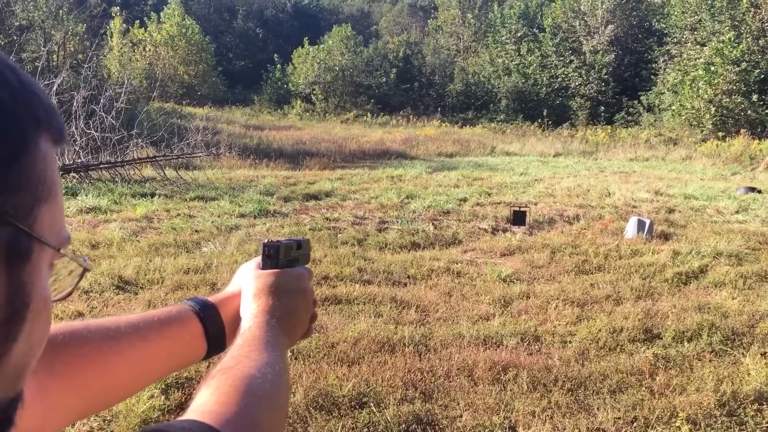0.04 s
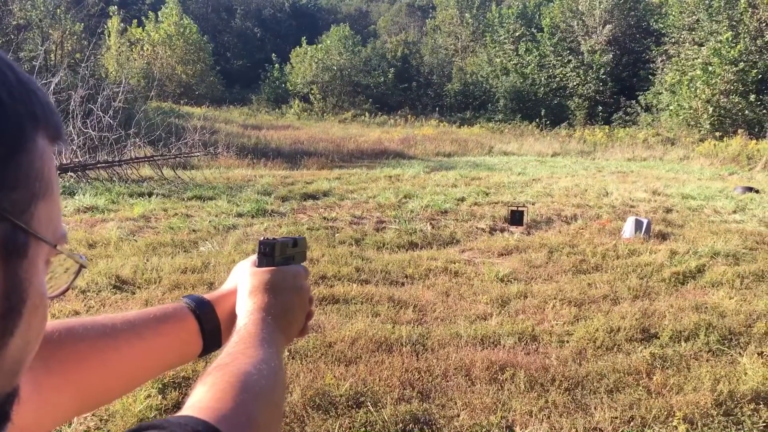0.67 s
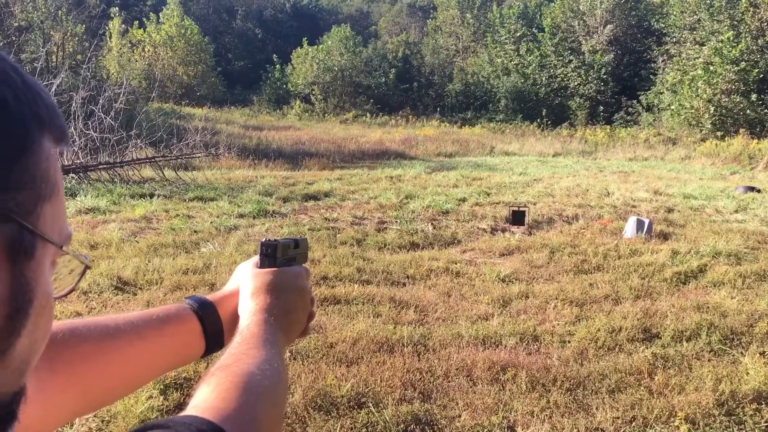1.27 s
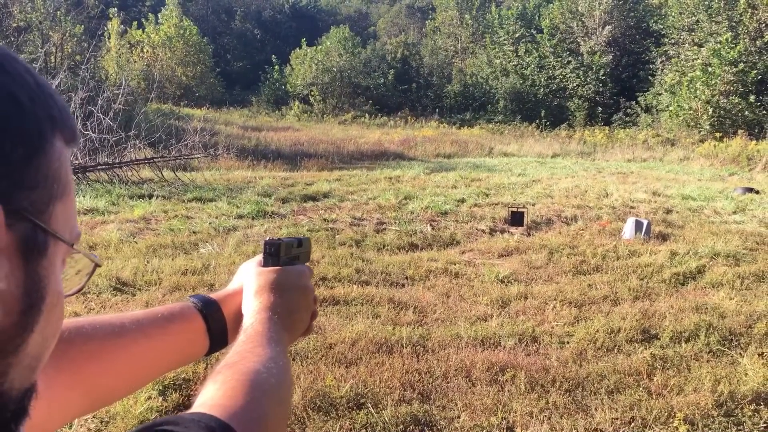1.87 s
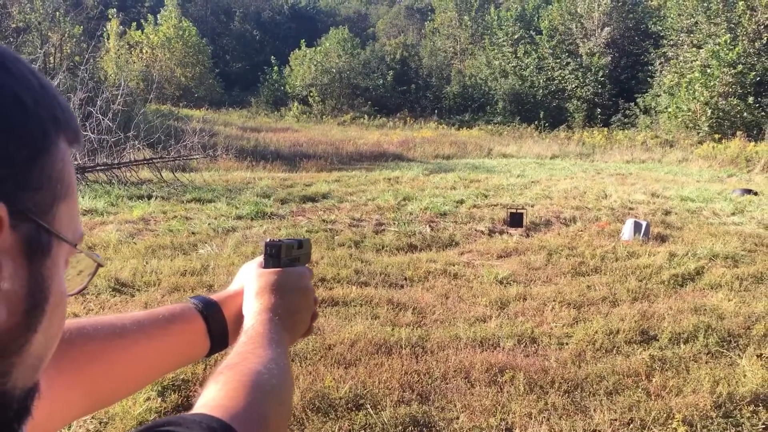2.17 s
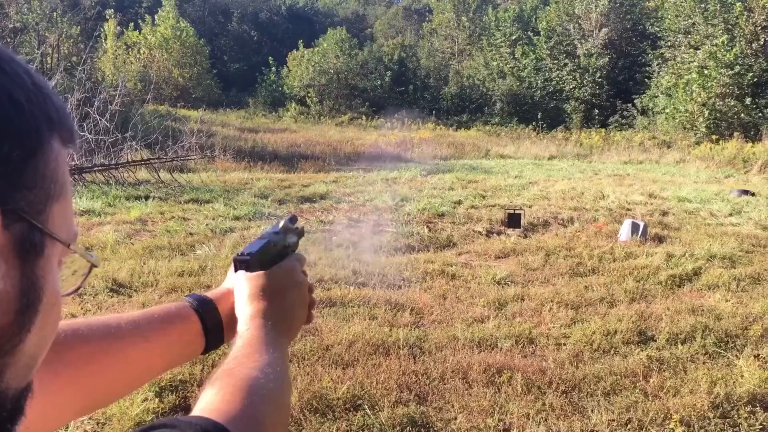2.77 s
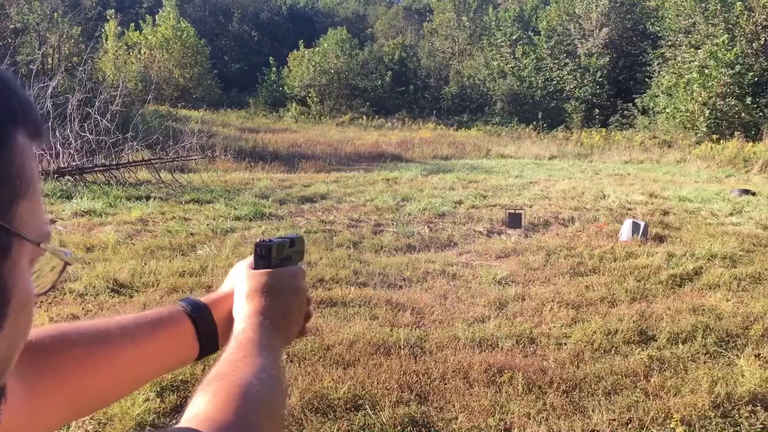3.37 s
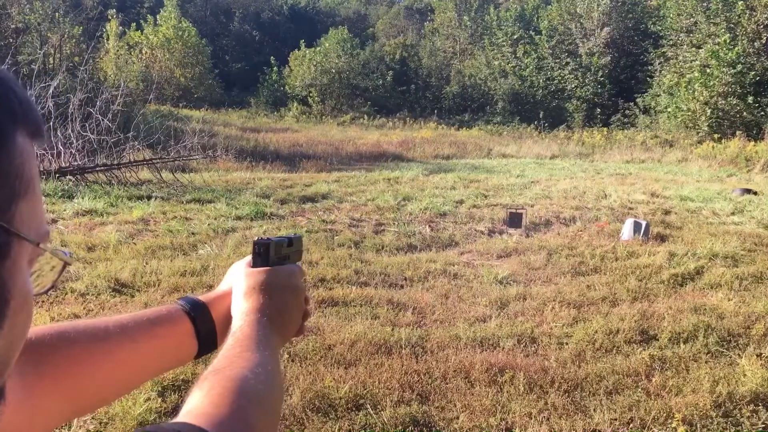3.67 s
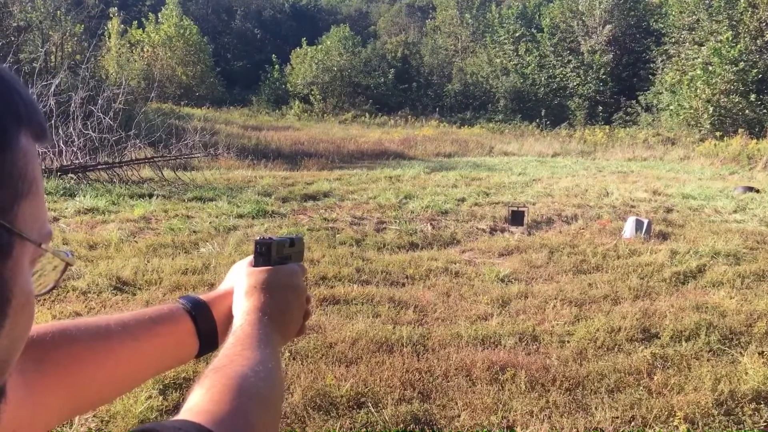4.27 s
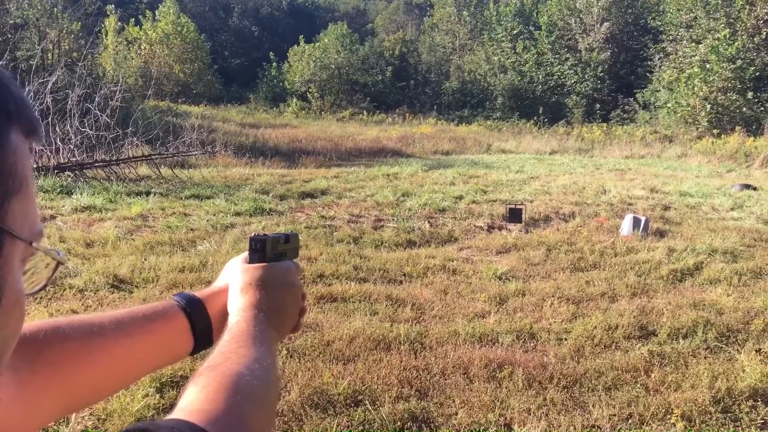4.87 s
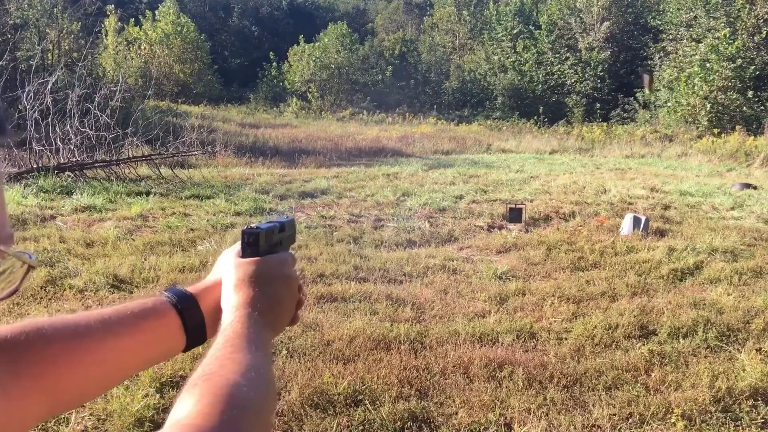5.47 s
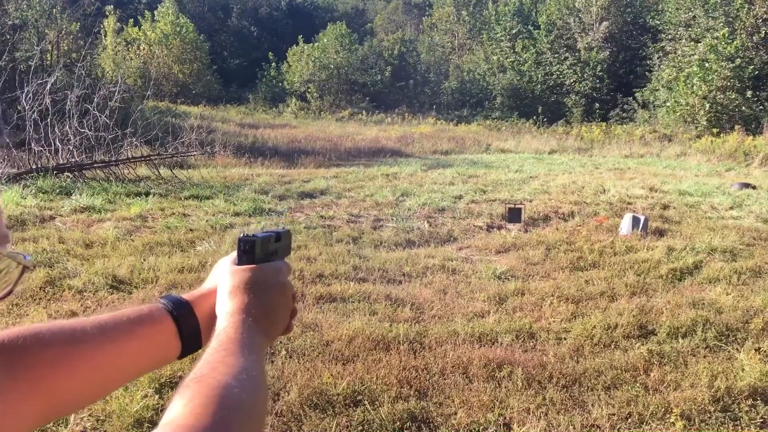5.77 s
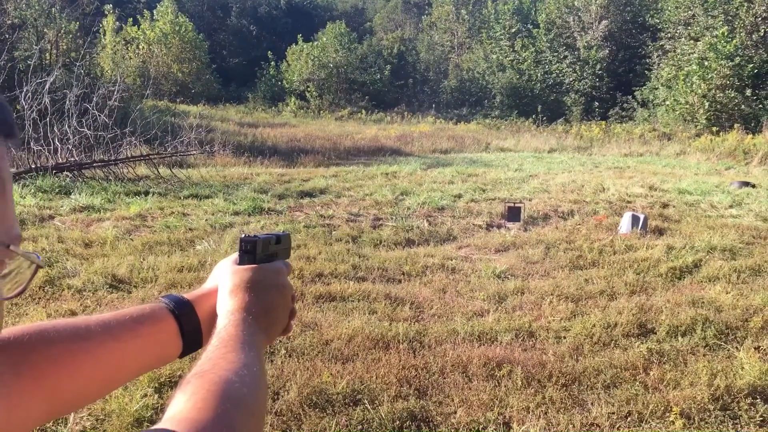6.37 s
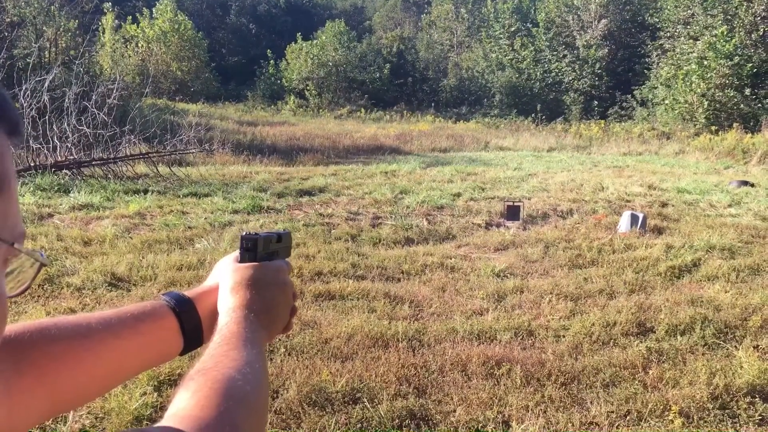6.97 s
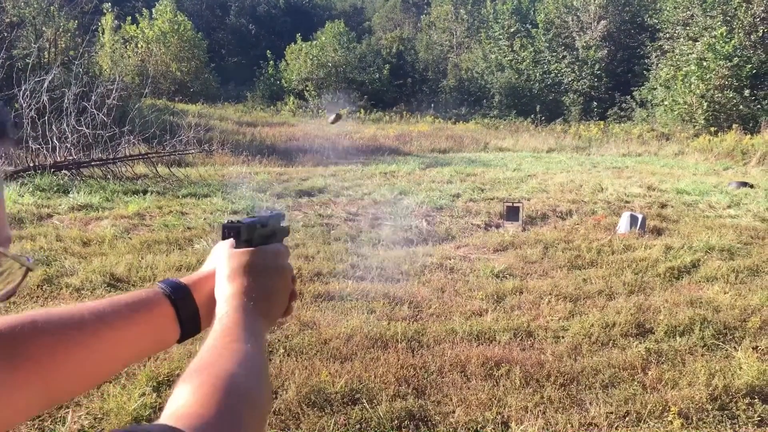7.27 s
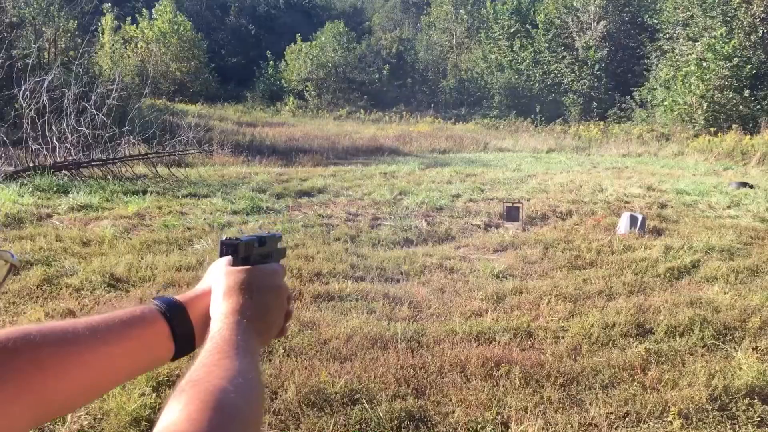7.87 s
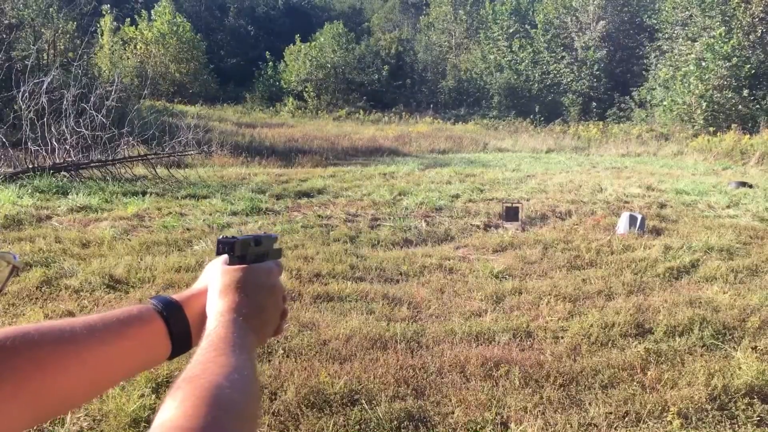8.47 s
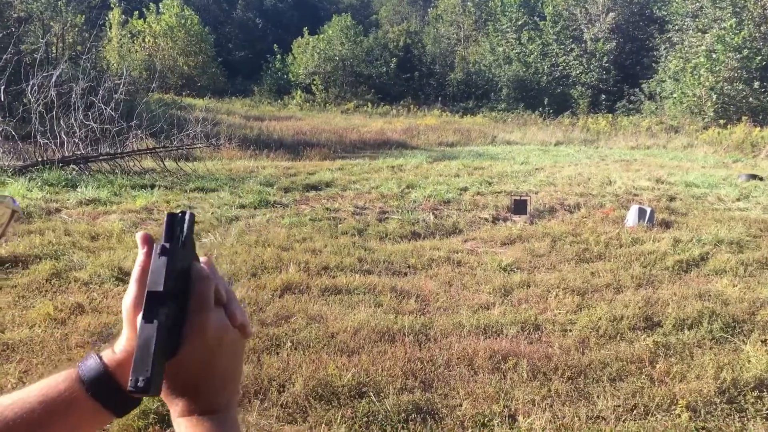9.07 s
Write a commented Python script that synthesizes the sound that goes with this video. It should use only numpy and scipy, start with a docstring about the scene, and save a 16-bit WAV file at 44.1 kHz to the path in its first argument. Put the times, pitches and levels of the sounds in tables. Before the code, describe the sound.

Three loud pistol shots crack an arm's length from the microphone in a field edged by forest. Before them come high insect song, a low far-off traffic rumble and one faint bird call. Every shot booms, smacks a metal target and rolls away through the trees, briefly pushing down the insects. The last two send a case ringing through the air, and small gun clicks and grassy rustles fall in the gaps.

```python
"""Three pistol shots in a meadow, fired an arm's length from the microphone.
At first insects sing over distant traffic and a fading hum, while an earlier shot's echo dies away.
A spent case drops into the grass, a bird calls, the trigger clicks. Then each blast overloads the
recorder, the slide shuts, the bullet slaps a plate, and brush and forest send the report back; the last
two cases ring in flight. After each shot the gain control recovers and the ducked insects return."""
import sys
import numpy as np
from scipy import signal
from scipy.fft import rfft, irfft, next_fast_len
from scipy.io import wavfile
from scipy.ndimage import uniform_filter1d, minimum_filter1d

SR = 44100
rng = np.random.default_rng(int(sys.argv[2]) if len(sys.argv) > 2 else 0)


def generate_wav(sig):
    """Save sig (samples, or channels by samples) to the path in sys.argv[1] as 16-bit PCM at SR."""
    pcm = np.round(np.clip(np.atleast_2d(sig).T, -1, 1) * 32767).astype(np.int16)
    wavfile.write(sys.argv[1], SR, pcm)


N = 402620

# shots: t/s, boom level/dB, crack level/dB, swing level/dB, swing f/Hz, target level/dB, echo level/dB
GUNSHOTS = [(2.8330, 11, 2.5, 8, 63, 9, -12.5), (5.1410, 5.5, 5, 1, 48.5, 9, -11.5),
            (7.2150, 8.5, 6, 8, 49.2, 11.5, -10)]
CRACK_S, GROUND_LAG_S = .021, .0045  # the shock follows the first gas; its ground reflection lags it
SOUND_M_PER_S = 343


def amp(db):
    """Amplitude ratio of a level in decibels."""
    return 10 ** (np.asarray(db) / 20)


def unit_rms(x):
    """Normalisation to unit mean power."""
    return x / np.sqrt(np.mean(x ** 2) + 1e-20)


def curve_at(points, hz):
    """Interpolation on a logarithmic frequency axis."""
    f, value = np.transpose(points)
    return np.interp(np.log(hz + 1), np.log(f + 1), value)


def clock(seconds):
    """Uniform sampling times from zero."""
    return np.arange(int(seconds * SR)) / SR


def add(mix, s, sound):
    """Superposition of a sound at time s, which may be negative."""
    at = round(s * SR)
    sound = sound[max(-at, 0):]
    part = mix[max(at, 0):][:len(sound)]
    part += sound[:len(part)]


def noise(spectrum, size):
    """Spectral shaping: noise of rms 1 whose density follows the given relative levels."""
    full = next_fast_len(size + 2048)
    hz = np.fft.rfftfreq(full, 1 / SR)
    white = rfft(rng.standard_normal(full))
    return unit_rms(irfft(white * amp(curve_at(spectrum, hz)), full))[:size]


def drift(per_s, size):
    """Random modulation of rms 1, interpolated between per_s values a second."""
    knots = rng.standard_normal(2000)
    return unit_rms(np.interp(np.arange(size) / SR * per_s, np.arange(len(knots)), knots))


def envelope(t, attack_s, hold_s, t60):
    """Quadratic onset, plateau, then exponential decay by 60 dB in t60 seconds."""
    fall_db = -60 * np.maximum(t - attack_s - hold_s, 0) / t60
    return np.clip(t / attack_s, 0, 1) ** 2 * amp(fall_db)


def burst(spectrum, db, attack_s, hold_s, t60):
    """Turbulence and scattering have random phase: a pulse of shaped noise."""
    t = clock(.7)
    return amp(db) * noise(spectrum, len(t)) * envelope(t, attack_s, hold_s, t60)


def tick(spectrum, t60):
    """Impact excitation: a brief contact gives broadband, quickly damped noise."""
    t = clock(0.67)
    return noise(spectrum, len(t)) * amp(-60 * t / t60)


def ring(modes):
    """Free vibration: each mode is a damped sinusoid."""
    t = clock(1)
    return sum(amp(db - 60 * t / t60) * np.sin(2 * np.pi * hz * t) for hz, db, t60 in modes)


def insects():
    """Stridulation: a far chorus, a near cricket trilling with each wing stroke, a lower one chirping."""
    # spectra of the three songs: f/Hz, level/dB
    chorus_band = [(2800, -31), (4200, -25), (4900, -18.5), (5350, -9.5), (5900, -10), (6500, -5),
                   (7100, -2), (7700, -8), (8600, -22), (10400, -28.5), (11500, -23.5), (14000, -20),
                   (15700, -23.5)]
    trill_band = [(6000, -43.5), (6800, -5.5), (7130, -1), (7400, -16.5), (8200, -45)]
    chirp_band = [(2800, -33), (3350, -4.5), (3500, -2), (3680, -9), (4200, -44)]
    t = np.arange(N) / SR
    stroke_hz = 28.1 * (1 + .012 * drift(5, N))
    strokes = np.sin(np.pi * np.cumsum(stroke_hz) / SR) ** 4
    chirps = np.sin(np.pi * (3.05 * t + .66)) ** 2
    chorus = amp(-57.5 + 0.33 * drift(9.2, N)) * noise(chorus_band, N)
    trill = amp(-64) * unit_rms(strokes) * noise(trill_band, N)
    return chorus + trill + amp(-78.5) * chirps * noise(chirp_band, N)


def traffic():
    """Distant traffic arrives as low-frequency noise of slightly fluctuating level."""
    # background spectrum: f/Hz, level/dB
    rumble = [(15, -32), (25, -23.5), (85, -4.5), (226, -23.5), (260, -25), (325, -23.5), (366, -28),
              (753, -34), (997, -36.5), (3000, -59), (3900, -86), (6600, -120)]
    return amp(-46.5 + 0.9 * drift(18, N)) * noise(rumble, N)


def hum():
    """Random amplitude and frequency modulation make a fading tone waver."""
    t = np.arange(N) / SR
    level = amp(-57.5 + 2.5 * drift(7, N)) * envelope(t, attack_s=0.31, hold_s=0.96, t60=8.5)
    hz = 325 + 4 * drift(25, N)
    return level * np.sin(2 * np.pi * np.cumsum(hz) / SR)


def echo_level(t):
    """The echo builds as sound enters the trees, then weakens by spherical spreading and absorption."""
    tree_line_m, deep_forest_m, loss_db_per_s = 38, 72.5, 10
    first_s, full_s = 2 * tree_line_m / SOUND_M_PER_S, 2 * deep_forest_m / SOUND_M_PER_S
    onset = np.clip((t - first_s) / 0.016, 0, 1)
    build_db = np.interp(t, [first_s, full_s], [-7, 0])
    beyond_s = np.maximum(t - full_s, 0)
    return onset * amp(build_db - loss_db_per_s * beyond_s) * full_s / (full_s + beyond_s)


def forest(grain_db, flutter_db):
    """Diffuse reflection from trunks and crowns; air absorption takes more treble from longer paths."""
    # scattered sound: f/Hz, level/dB
    echo_spectrum = [(30, -49.5), (70, -26.5), (150, -20.5), (300, -17), (470, -15), (600, 1), (800, 2.5),
                     (1000, 3.5), (1350, -6), (1800, -1.5), (2600, -9), (3300, -2), (6500, -4.5),
                     (9500, -10.5), (15500, -24)]
    # loss on the way: f/Hz, decay rate/(dB/s)
    absorption = [(100, 1), (400, -2), (750, 3.5), (1400, 12), (2700, 24), (4600, 39), (8000, 46),
                  (14000, 55)]
    t = clock(4)
    reflections = rng.standard_normal(len(t))
    reflections *= amp(grain_db * drift(500, len(t)) + flutter_db * drift(34.6, len(t)))
    hz, age, frames = signal.stft(unit_rms(reflections), SR, nperseg=512)
    colour = amp(curve_at(echo_spectrum, hz)[:, None] - curve_at(absorption, hz)[:, None] * age)
    colour /= np.sqrt(np.mean(colour[:, np.searchsorted(age, .5)] ** 2))  # unit power at 0.5 s
    return signal.istft(frames * colour, SR, nperseg=512)[1][:len(t)] * echo_level(t)


def landing_cases():
    """Impact: a spent case rustles the grass and rings faintly in one mode."""
    # impacts: t/s, rustle level/dB, ring level/dB
    landings = [(0.784, -57, -96), (3.711, -49, -66), (6.058, -44, -61), (6.176, -52, -66),
                (8.061, -37, -77)]
    # rustle spectrum: f/Hz, level/dB
    grass = [(1500, -25), (6000, 0), (9000, -2), (12000, 1), (15500, -10)]
    # case resonance: f/Hz, level/dB, t60/s
    brass_mode = [(10700, 0, 0.5)]
    out = np.zeros(N)
    for s, rustle_db, ring_db in landings:
        add(out, s, amp(rustle_db) * tick(grass, t60=0.05))
        add(out, s, amp(ring_db) * ring(brass_mode))
    return out


def bird():
    """A swelling downward glide, strongest in its second harmonic, reverberates among the trees."""
    start_s, length_s = 1.695, 0.11
    start_hz, sag_hz_per_s, swell_db_per_s = 2090, 3400, 54
    t = clock(.25)
    rasp = 1 + .016 * drift(700, len(t))
    phase = 2 * np.pi * np.cumsum((start_hz - sag_hz_per_s * t) * rasp) / SR
    level = amp(swell_db_per_s * (t - length_s) + 2 * drift(77, len(t)))
    level *= envelope(t, attack_s=.005, hold_s=length_s, t60=.04)
    note = level * (np.sin(2 * phase) + .5 * np.sin(phase))
    trees = rng.standard_normal(SR) * amp(-60 * clock(1) / .6)
    out = np.zeros(N)
    add(out, start_s, note)
    add(out, start_s, amp(-3) * signal.fftconvolve(note, trees / np.linalg.norm(trees)))
    return amp(-65.5) * out


def gun_clicks():
    """Contact transients of trigger and slide: each a low knock with a bright snap."""
    # contacts: t/s, knock level/dB, snap level/dB
    clicks = [(2.199, -57, -73), (4.0807, -25, -31), (4.399, -57, -75), (5.029, -63, -73),
              (6.1340, -28, -22.5), (8.8506, -36, -54), (8.9994, -52, -67)]
    # contact spectra: f/Hz, level/dB
    knock = [(300, -22), (1400, 6), (2200, -1.5), (3000, -11), (3700, 5.5), (4700, -8.5), (5600, -13),
             (7000, -15), (15000, -26)]
    snap = [(2000, -24), (7000, -34), (8300, 8), (9500, -21), (11000, -10), (12400, 2), (13800, -14),
            (15500, -15)]
    out = np.zeros(N)
    for s, knock_db, snap_db in clicks:
        add(out, s, amp(knock_db) * tick(knock, t60=0.013))
        add(out, s, amp(snap_db) * tick(snap, t60=0.0069))
    return out


def boom():
    """Sudden expansion of the first gas: a dull boom with a nasal bark, and a kick to the low modes."""
    # gas spectra: f/Hz, level/dB
    dull_gas = [(30, -10.5), (150, -15), (250, 0.5), (400, -2), (560, -2), (730, -1.5), (930, -8.5),
                (1300, -16), (2000, -19), (3100, -19), (3800, -36.5), (16000, -56)]
    bark = [(2000, -30.5), (2380, -3.5), (2550, 4.5), (2800, -8.5), (3150, -7), (3600, -36.5)]
    # low modes: f/Hz, level/dB, t60/s
    punch = [(264.7, -9, 0.068), (420, -11.5, 0.069), (706, -5, 0.036)]
    out = np.zeros(SR)
    add(out, 0, burst(dull_gas, db=0, attack_s=0.016, hold_s=0.014, t60=0.027))
    add(out, 0, burst(bark, db=-6, attack_s=0.016, hold_s=.008, t60=.04))
    add(out, .0115, amp(2) * ring(punch))
    return out


def crack():
    """After a thin hiss the shock rings hollows, reflects off the ground and scatters in the field."""
    # spectra of the hiss, the report and its scattered part: f/Hz, level/dB
    spit = [(300, -6.5), (2500, 5), (5000, -2.5), (9000, -8.5), (15500, -12)]
    report = [(140, -29.5), (230, -6.5), (674, -7), (818, -10.5), (975, -3), (1180, -5.5), (2530, -10),
              (2810, -19), (3990, -9), (4850, -13), (15500, -22.5)]
    field = [(35, -31), (60, -14.5), (231, -7.5), (976, -4.5), (1290, -7.5), (1480, -7), (2840, -12),
             (3580, -10), (4520, -16.5), (5980, -13.5), (15500, -27.5)]
    # cavity modes round the microphone: f/Hz, level/dB, t60/s
    hollows = [(313.4, -4.5, 0.044), (400, -7.5, 0.084), (680, -3, 0.16), (919, 2, 0.22), (1767, -1, 0.13),
               (1991, -16.5, .08), (2000, -13, 0.077), (2640, -13, 0.042), (2800, -14, .08),
               (3311, -12, 0.12), (3930, -13, 0.11)]
    out = np.zeros(SR)
    add(out, 0, burst(spit, db=-19.5, attack_s=.0015, hold_s=.001, t60=.06))
    add(out, CRACK_S, amp(15) * shock(overpressure_s=0.00084))
    add(out, CRACK_S, burst(report, db=5, attack_s=0.00052, hold_s=0.001, t60=.018))
    add(out, CRACK_S, amp(-7) * ring(hollows))
    add(out, CRACK_S + GROUND_LAG_S, burst(report, db=1.5, attack_s=0.0037, hold_s=.017, t60=.04))
    add(out, CRACK_S, burst(field, db=-10.5, attack_s=0.031, hold_s=.025, t60=0.46))
    return out


def shock(overpressure_s):
    """A blast wave: instant overpressure, then rarefaction."""
    u = clock(.5) / overpressure_s
    return (1 - u) * np.exp(-u)


def swing(hz, rise_s):
    """Damped oscillation behind the shock: suction first, then pressure swings that slow towards hz."""
    t = clock(.5)
    cycles = np.cumsum(hz * (1 + 1.3 * np.exp(-t / 0.0064))) / SR
    u = t / rise_s
    return -np.sin(2 * np.pi * cycles) * u ** .5 * np.exp((1 - u ** 2) / 4)


def slide():
    """Hard impact: the slide slams shut with a short, bright clash."""
    # spectrum of steel on steel: f/Hz, level/dB
    steel = [(2000, -24), (6500, 0), (9000, -2.5), (11500, -2.5), (13500, -7), (15500, -6)]
    return burst(steel, db=-1, attack_s=0.004, hold_s=.003, t60=0.04)


def target():
    """Impact excitation: each bullet splashes on a plate, whose modes ring briefly."""
    # impact spectrum: f/Hz, level/dB
    slap = [(300, -30.5), (1500, -8), (3000, -7), (3900, -1), (5200, -9.5), (7000, -1.5), (8300, -6),
            (10500, -7), (12500, -13), (15500, -13.5)]
    # plate resonances: f/Hz, level/dB, t60/s
    plate_modes = [(3640, -21.5, 0.11), (6850, -12.5, 0.061), (7900, -37, .06), (11260, -20, 0.077)]
    delay_s = .099
    out = np.zeros(N)
    for s, *_, hit_db, _ in GUNSHOTS:
        splash = tick(slap, t60=0.011) + amp(-14.5) * tick(slap, t60=0.1)
        add(out, s + delay_s, amp(hit_db) * splash)
        add(out, s + delay_s, amp(hit_db) * ring(plate_modes))
    return out


def brush():
    """A discrete echo: a pile of brush before the trees returns one dull slap."""
    # reflected spectrum: f/Hz, level/dB
    dull_slap = [(200, -23), (450, -12), (620, 16), (850, -16), (2000, -40), (8000, -60)]
    return burst(dull_slap, db=-23, attack_s=0.0083, hold_s=0.014, t60=0.044)


def pistol():
    """Direct sound of muzzle and slide comes first; echoes follow after their round-trip times."""
    brush_m = 34.8
    out = np.zeros(N)
    for s, boom_db, crack_db, swing_db, swing_hz, _, echo_db in GUNSHOTS:
        add(out, s, amp(boom_db) * boom())
        add(out, s, amp(crack_db) * crack())
        add(out, s + CRACK_S + GROUND_LAG_S, amp(swing_db) * swing(swing_hz, rise_s=0.01))
        add(out, s + 0.056, slide())
        add(out, s + 2 * brush_m / SOUND_M_PER_S, brush())
        add(out, s, amp(echo_db) * forest(grain_db=1.5, flutter_db=0.92))
    return out


def flying_cases():
    """Directional radiation: a ringing case tumbles, and its turning mouth modulates the amplitude."""
    # cases in flight: t/s, level/dB
    ejections = [(5.240, -18), (7.314, -10.5)]
    # case resonances: f/Hz, level/dB, t60/s
    brass_modes = [(3300, -6.5, 0.39), (7860, -15.5, 0.63), (11170, 0.5, .2), (11480, -15, .25),
                   (13800, -14.5, 0.96), (14210, -7.5, .15)]
    out = np.zeros(N)
    for s, db in ejections:
        tumble_hz = rng.uniform(6, 9.8)
        tumble = 1 + .5 * np.cos(2 * np.pi * tumble_hz * clock(1))
        add(out, s, amp(db) * ring(brass_modes) * tumble)
    return out


def scene():
    """Linear superposition of all sources at one microphone."""
    shots = pistol()
    add(shots, -2.3, amp(-16) * forest(grain_db=1, flutter_db=2))  # an earlier shot is still dying away
    metal = target() + flying_cases() + landing_cases() + gun_clicks()
    return (shots + metal + insects() + traffic() + hum() + bird())[None]


def recover(cut_db, db_per_s, hold_s=0.12):
    """Peak detection: follows each rise at once, holds it, then releases at a steady rate."""
    half = round(hold_s * SR / 2)
    held_db = -minimum_filter1d(-cut_db, 2 * half + 1, origin=half)
    fall_db = np.arange(N) / SR * db_per_s
    return np.maximum.accumulate(held_db + fall_db) - fall_db


def record(dry):
    """Automatic gain control with a quick and a slow release, then soft saturation and a band limit."""
    threshold_db, range_db, ceiling, cutoff_hz = -30, 18, .86, 15900
    power_db = 10 * np.log10(abs(uniform_filter1d(dry[0] ** 2, size=500)) + 1e-12)
    cut_db = 0.72 * np.maximum(power_db - threshold_db, 0)
    quick_db = np.minimum(recover(cut_db, db_per_s=32), range_db)
    slow_db = recover(0.33 * quick_db, db_per_s=3.5)
    ducked = dry / amp(uniform_filter1d(np.maximum(quick_db, slow_db), size=100))
    clipped = ducked / (1 + (ducked / ceiling) ** 4) ** .25
    lowpass = signal.firwin(255, cutoff_hz, window=("kaiser", 8), fs=SR)
    return signal.oaconvolve(clipped, lowpass[None], "same")


dry = scene()
out = record(dry)
generate_wav(out)
```